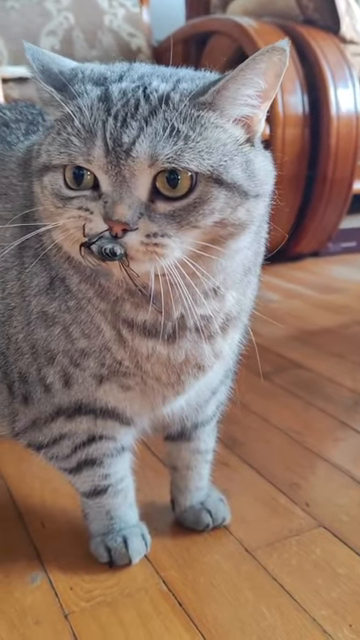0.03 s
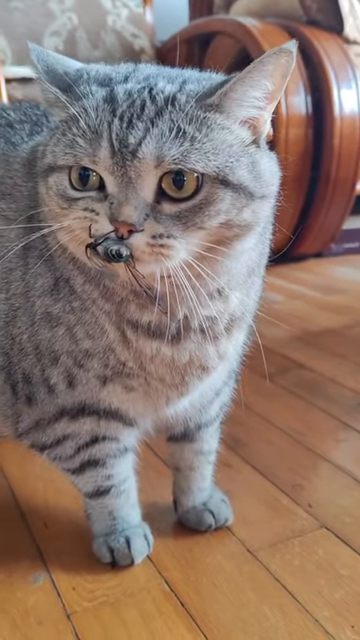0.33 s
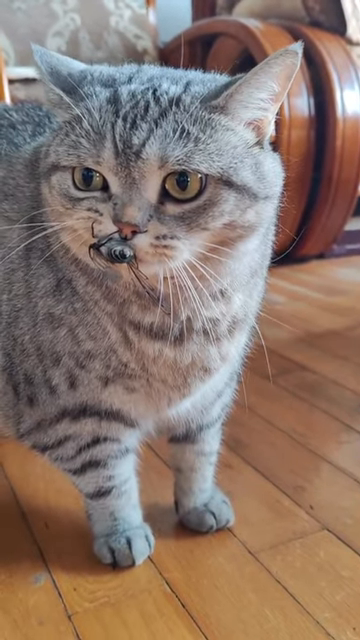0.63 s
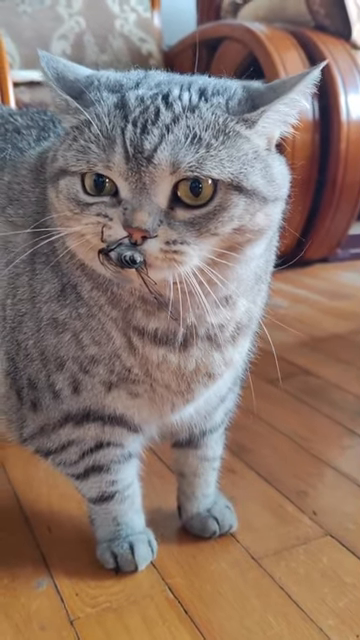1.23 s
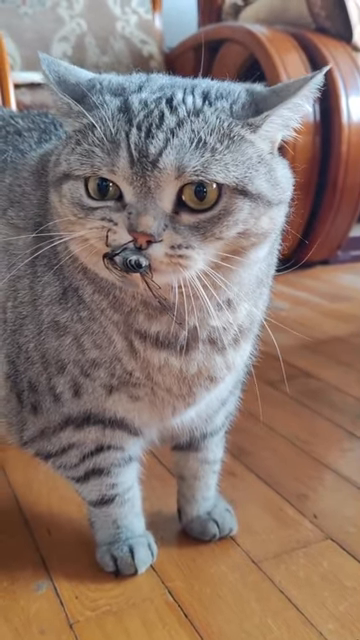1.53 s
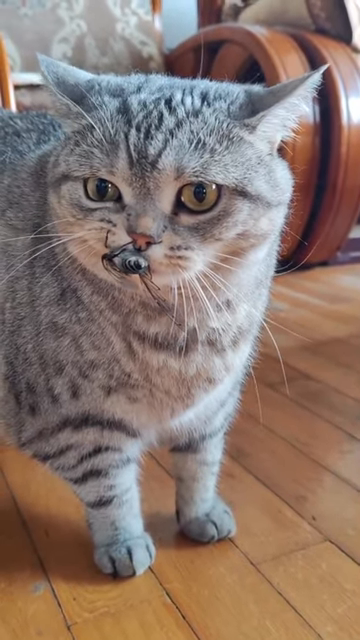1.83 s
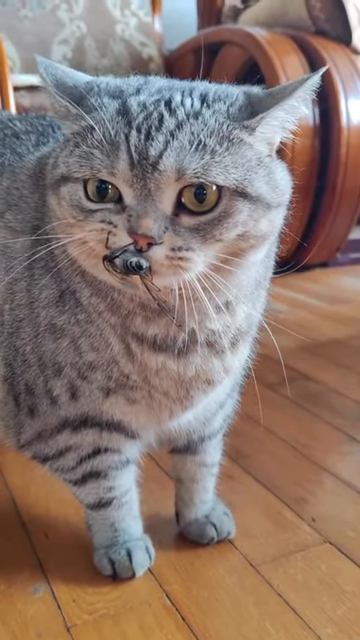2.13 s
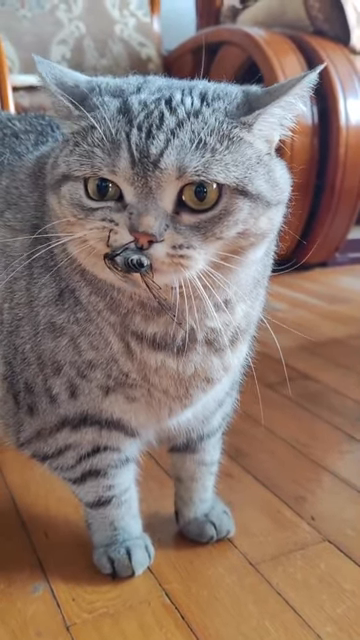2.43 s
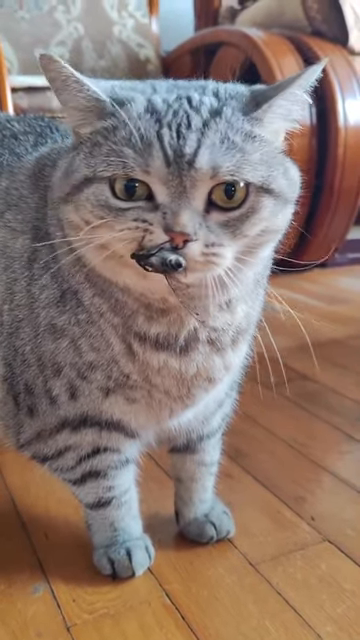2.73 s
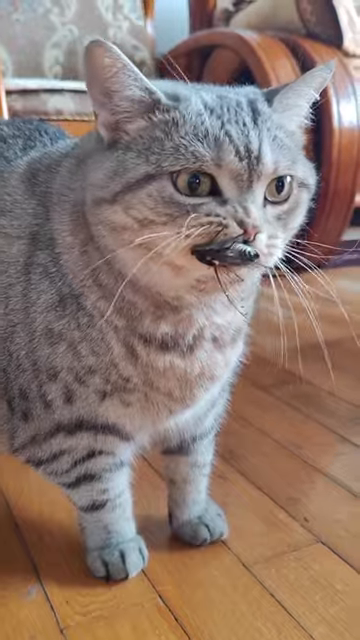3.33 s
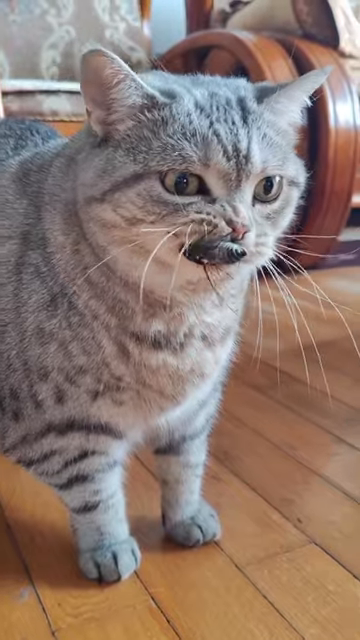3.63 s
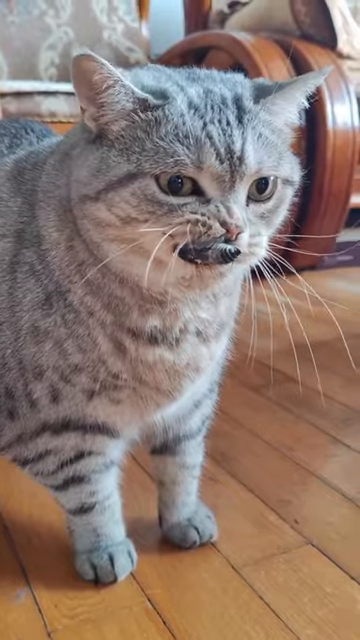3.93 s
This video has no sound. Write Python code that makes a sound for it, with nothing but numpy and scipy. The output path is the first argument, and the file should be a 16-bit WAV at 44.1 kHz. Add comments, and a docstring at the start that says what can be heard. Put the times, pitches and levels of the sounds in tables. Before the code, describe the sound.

Sudden harsh cicada buzz indoors, following a quiet stretch with faint, distant bird calls.

```python
"""Cat with a live cicada

A cat stands in a wood-floored room, a cicada in its mouth. Over low rumble, hiss and sizzle, a bird
whistles far outside; thin high tones and a faint buzz come and go. Late on, the insect squeaks, then
bursts into a harsh buzz: its two tymbals buckle in turn, each buckle a low ping, each spring-back a
higher ping with its overtone, with a crackle of ribs and a few sharp ticks on top."""
import sys
import numpy as np
from scipy import signal
from scipy.io import wavfile
from scipy.ndimage import uniform_filter1d

SR = 44100
rng = np.random.default_rng(int(sys.argv[2]) if len(sys.argv) > 2 else 0)


def generate_wav(signal):
    """Clip the signal to [-1, 1] and save it as 16-bit WAV at the path in sys.argv[1]."""
    frames = np.transpose(np.atleast_2d(signal))
    scaled = np.clip(frames, -1, 1) * 32767
    pcm = np.round(scaled).astype(np.int16)
    wavfile.write(sys.argv[1], SR, pcm)


N = 176400

# tone of each noise bed (frequency [Hz], left [dB], right [dB])
RUMBLE_EQ = [(33, -26, -28), (44.95, 2.5, 5), (101, -6.5, -6), (146, -1.5, 1.5), (191, 1, 2),
             (257, -7.5, -4), (700, -16, -15.5), (1006, -15, -14), (2400, -25.5, -26), (6050, -69, -47)]
HISS_EQ = [(1180, -32, -5), (2280, -18, -11.5), (2710, 1, 1), (3730, 1, 4), (4480, -3, 0),
           (5330, -10.5, -7.5), (6720, -12.5, -11.5), (7330, -33.5, -38)]
SIZZLE_EQ = [(6000, -37, -28), (9850, -28.5, -32.5), (10790, -9, -12), (12150, -4.5, -25), (12620, 3.5, -1),
             (13800, -4, -12), (16100, -13, -9.5)]
# fader ride of each bed (time [s], relative level [dB])
RUMBLE_RIDE = [(0.0, -57), (1.54, -58.5), (1.65, -52), (1.77, -58), (2.53, -57.5), (2.6, -54),
               (2.72, -57.5), (3.11, -56.5), (3.5, -64.5)]
HISS_RIDE = [(0.17, -60), (0.39, -63.5), (0.63, -58.5), (0.77, -62.5), (1.66, -65), (2.89, -62.5),
             (2.96, -61)]
SIZZLE_RIDE = [(0.56, -73.5), (1.01, -63), (1.18, -65.5)]
# stereo image of the beds (frequency [Hz], left-right correlation [-1 to 1])
BED_CORRELATION = [(100, 0.92), (290, 0.87), (640, 0.21), (1400, -0.41), (6000, 0.027)]
# distant bird notes (time [s], length [s], start pitch [Hz], end pitch [Hz], level [dB])
BIRD_NOTES = [(.22, .13, 1680, 1880, -71), (.47, 0.21, 1930, 1660, -65.5), (1.56, 0.1, 1850, 1780, -67.5),
              (1.61, 0.1, 1480, 1350, -67), (1.67, 0.18, 1260, 1160, -62.5), (2.33, 0.2, 1890, 1790, -60),
              (2.6, .13, 1220, 1120, -68.5)]
# the room's reverb (frequency [Hz], time to fall 60 dB [s])
ROOM_DECAY = [(500, 0.99), (4000, 0.51), (14000, 0.19)]
# a faint buzz, perhaps a wing (time [s], length [s], fundamental [Hz])
FAINT_BUZZ_CUE = (.49, .25, 169.6)
# its tone (frequency [Hz], gain [dB])
FAINT_BUZZ_EQ = [(3000, -25), (3450, 4.5), (4700, -1), (5200, -10)]
# cicada squeaks (time [s], length [s], start pitch [Hz], end pitch [Hz], relative level [dB])
SQUEAK_NOTES = [(3.269, 0.036, 4300, 3640, -50.5), (3.273, 0.025, 6250, 5300, -66),
                (3.299, 0.005, 4400, 4200, -50), (3.312, 0.0088, 2190, 1950, -38.5),
                (3.319, 0.0071, 5750, 5340, -35), (3.322, 0.0152, 4500, 3300, -44)]
# pace of each tymbal (time [s], cycle rate [Hz])
TYMBAL_RATE = [(3.339, 135), (3.4, 122), (3.46, 129), (3.52, 127), (3.57, 146), (3.64, 131.6), (3.8, 125),
               (4.0, 117.7)]
# inward snap (time [s], ring [Hz], relative level [dB], relative level of the abdomen's ring [dB])
BUCKLE_RING = [(3.35, 3700, -24, -39), (3.45, 3410, -24.5, -39), (3.485, 3870, -27, -52),
               (3.535, 4040, -29, -57), (3.614, 3580, -25, -49), (3.68, 3480, -27, -37.5),
               (3.74, 3460, -26.5, -41.5), (3.82, 3600, -27.5, -51), (3.89, 3600, -27, -46),
               (4.0, 3560, -25.5, -39.5)]
# outward snap (time [s], ring [Hz], relative level [dB])
SPRING_RING = [(3.35, 5290, -24.5), (3.405, 5200, -27), (3.45, 5780, -23), (3.53, 5910, -22.5),
               (3.6, 5900, -24), (3.72, 4980, -27), (3.79, 4940, -32.5), (3.89, 5240, -27),
               (4.0, 5340, -26)]
# balance of the rib crackle (time [s], lower treble [dB], middle treble [dB], top [dB])
RIB_CRACKLE = [(3.35, -35, -40, -44), (3.414, -36.5, -41, -38), (3.494, -32.5, -44, -40),
               (3.58, -34, -31.5, -38.5), (3.68, -37.5, -35.5, -33), (3.78, -37, -37, -32.5),
               (4.0, -37, -39, -37)]
# sharp ticks in the buzz (time [s], relative level [dB])
TICK_HITS = [(3.667, -20), (3.806, -26.5), (3.9563, -23.5)]
# moving notch in the buzz (time [s], centre [Hz], depth [0-1])
HOLLOW_SWEEP = [(3.45, 1900, .1), (3.53, 2520, .95), (3.66, 2480, .95), (3.75, 2380, .35), (3.87, 2500, .9)]
# tone of the cicada (frequency [Hz], left [dB], right [dB])
CICADA_EQ = [(600, -16, -12.5), (1390, -17, -15.5), (2130, -7.5, -2.5), (2715, 2, 0.5), (3380, -7.5, 1),
             (4080, -0.5, 4.5), (4640, -2.5, -2.5), (5140, -6, 5.5), (6530, -5.5, -2.5), (7640, -7, -1.5),
             (10500, -7, -4), (11180, 8, 5.5), (13100, 4, -6.5), (14200, 2.5, -2), (16100, -5, -1.5)]

BUZZ_START_S, POSE_S = 3.339, 0.141  # the head takes a new pose every POSE_S
EVEN_RATE_HZ, LIMP_S = 116, .0062  # above the even rate, the second tymbal falls later in the cycle
BUCKLE_S, SPRING_S, BELLY_S, RIB_S = 0.00016, 0.00015, 0.00046, 0.00072  # envelope time constants
BUCKLE_DB, SPRING_DB, OVERTONE_DB, BELLY_DB, RIB_DB = 3.5, 0.5, -17, 3.5, 10  # trims on the tables
BELLY_HZ, SPRING_LAG_S = 2120, .0026
JITTER_S, UNEVEN_DB, PITCH_SCATTER = .0001, 0.6, 0.033  # spread from snap to snap
EARLY_DB, ROOM_DB, RIGHT_LAG_S = -5.5, -9.5, 0.00014  # the cicada's reverb sends and stereo offset


def amp(db):
    """Decibels to gain."""
    return 10 ** (np.asarray(db) / 20)


def unit(x):
    """Scales to rms 1."""
    return x / np.sqrt(np.mean(x ** 2) + 1e-20)


def curve(table, s):
    """All columns of a time table at s."""
    times, *columns = np.transpose(table)
    return np.array([np.interp(s, times, c) for c in columns])


def spectrum(table, hz):
    """All columns of a frequency table at hz."""
    f, *columns = np.transpose(table)
    return np.array([np.interp(np.log(hz + 1), np.log(f), c) for c in columns])


def add(mix, s, sound):
    """Mixes a sound in at time s."""
    part = mix[..., round(s * SR):][..., :sound.shape[-1]]
    part += sound[..., :part.shape[-1]]


def band(x, lo_hz, hi_hz):
    """Band-pass."""
    return signal.sosfilt(signal.butter(3, [lo_hz, hi_hz], "band", fs=SR, output="sos"), x)


def noise_bed(eq, ride, gain_db, patchy_db, lines_db, size=2048):
    """Stereo noise with drifting patches and soft, narrow resonances that come and go."""
    hz, hop = np.fft.rfftfreq(size, 1 / SR), size // 4
    a, b, c, d, patches = rng.standard_normal((N // hop + 5, len(hz), 5)).T
    patches = unit(uniform_filter1d(uniform_filter1d(patches, size=8, axis=0), size=8, axis=1))
    lines = uniform_filter1d(rng.standard_normal(a.shape), size=26, axis=1)
    lines = unit(np.tanh(unit(lines)))
    likeness = spectrum(BED_CORRELATION, hz).T
    left = a + 1j * b
    right = likeness * left + np.sqrt(1 - likeness ** 2) * (c + 1j * d)
    gain = amp(spectrum(eq, hz)[:, :, None] + patchy_db * patches + lines_db * lines)
    noise = signal.istft(np.array([left, right]) * gain, nperseg=size, noverlap=size - hop)[1][:, :N]
    return unit(noise) * amp(gain_db + curve(ride, np.arange(N) / SR))


def whistles(notes, waver, blur, blur_hz):
    """Gliding tones that swell and fade; a share of each is blurred into a narrow band of noise."""
    out = np.zeros(N)
    smooth = signal.butter(2, blur_hz, fs=SR, output="sos")
    a, b = unit(signal.sosfilt(smooth, rng.standard_normal((2, N))))
    fuzz = np.sqrt(1 - blur) + np.sqrt(blur / 2) * (a + 1j * b)
    for s, length, from_hz, to_hz, db in notes:
        u = np.linspace(0, 1, round(length * SR))
        drift = np.interp(u, np.linspace(0, 1, 10), rng.standard_normal(10))
        hz = (from_hz + (to_hz - from_hz) * u ** 1.41) * (1 + waver * drift)
        tone = fuzz[round(s * SR):][:len(u)] * np.exp(2j * np.pi * np.cumsum(hz) / SR)
        add(out, s, amp(db) * 2 * np.sin(np.pi * u ** 0.91) * tone.real)
    return out


def thin_tones(count=26, low_hz=3750, high_hz=5050, length_s=.28, within_s=1.85, db=-78.5):
    """A soft cluster of thin high tones that come and go at random in the first half."""
    when, place = rng.random((count, 2)).T
    pitches = low_hz + (high_hz - low_hz) * place
    notes = [(s, length_s, hz, hz, db) for s, hz in zip(when * within_s, pitches)]
    return whistles(notes, waver=0, blur=0.68, blur_hz=8.5)


def bird():
    """Mostly falling whistles from far outside, blurred by distance."""
    song = whistles(BIRD_NOTES, waver=0.013, blur=0.45, blur_hz=40)
    return song + amp(-14) * room(song)


def room(x, size=256):
    """Diffuse tail, different left and right, the treble dying first."""
    hz, t, noise = signal.stft(rng.standard_normal((2, SR // 2)), SR, nperseg=size)
    decay = amp(-60 * t / spectrum(ROOM_DECAY, hz).T) * (t > 0)
    tail = signal.istft(noise * decay, SR, nperseg=size)[1]
    return signal.fftconvolve(x[None], tail / np.linalg.norm(tail[0]), axes=1)[:, :N]


def faint_buzz():
    """A brief, thin buzz of high harmonics drifting in phase, heard through the room."""
    s, length, pitch = FAINT_BUZZ_CUE
    t = np.arange(round(length * SR)) / SR
    partials = pitch * np.arange(18, 39)
    gains = amp(spectrum(FAINT_BUZZ_EQ, partials)[0]) * rng.rayleigh(size=len(partials))
    drift = np.cumsum(rng.standard_normal((len(partials), len(t))), axis=1) / np.sqrt(SR)
    buzz = gains @ np.sin(2 * np.pi * (partials[:, None] * t + drift + rng.random((len(partials), 1))))
    out = np.zeros(N)
    add(out, s, amp(-60) * unit(buzz * np.sin(np.pi * t / length) ** .5))
    return out + room(out)


def squeaks(grains_per_s=1500):
    """Falling squeaks over a gritty scratching that grows until the buzz starts."""
    t, first = np.arange(N) / SR, SQUEAK_NOTES[0][0]
    grit = band(rng.standard_normal(N) * (rng.random(N) < grains_per_s / SR), 2000, 6500)
    swell = np.clip((t - first) / (BUZZ_START_S - first), 0, 1) * (t < BUZZ_START_S)
    chirps = whistles(SQUEAK_NOTES, waver=0.014, blur=0.2, blur_hz=300)
    return chirps + amp(-54) * swell * unit(grit)


def ping(hz, tau_s):
    """One short ring of tymbal or abdomen, of unit energy, peaking near three time constants."""
    t = np.arange(SR // 200) / SR
    ring = (t / tau_s) ** 2.97 * np.exp(-t / tau_s) * np.sin(2 * np.pi * hz * t)
    return ring / np.linalg.norm(ring)


def puff(decay_s):
    """A tiny burst of crackle, of unit energy, different left and right."""
    t = np.arange(SR // 200) / SR
    burst = rng.standard_normal((2, len(t))) * np.exp(-t / decay_s) * (1 - np.exp(-2 * t / decay_s))
    return burst / np.linalg.norm(burst, axis=1, keepdims=True)


def tymbals():
    """Two tymbals buckle in turn and spring back; every snap rings and crackles."""
    t = np.arange(N) / SR
    rate = curve(TYMBAL_RATE, t)[0]
    cycles = np.cumsum(rate * (t >= BUZZ_START_S)) / SR
    first = np.arange(cycles[-1])
    second = first + .5 + LIMP_S * (np.interp(first, cycles, rate) - EVEN_RATE_HZ)
    snaps = np.sort(np.r_[first, second])
    rings, ribs = np.zeros(N), np.zeros((2, N))
    for s in t[np.searchsorted(cycles, snaps, "right").clip(0, N - 1)]:
        dice = rng.standard_normal(8)
        jitter, uneven, detune = JITTER_S * dice, amp(UNEVEN_DB * dice), 1 + PITCH_SCATTER * dice
        inward, outward = s + jitter[0], s + SPRING_LAG_S + jitter[1]
        hz, db, belly_db = curve(BUCKLE_RING, s)
        add(rings, inward, amp(BUCKLE_DB + db) * uneven[2] * ping(hz * detune[3], BUCKLE_S))
        add(rings, inward, amp(BELLY_DB + belly_db) * ping(BELLY_HZ * detune[3], BELLY_S))
        add(ribs, inward, uneven[6] * puff(RIB_S * 2))
        hz, db = curve(SPRING_RING, s)
        add(rings, outward, amp(SPRING_DB + db) * uneven[4] * ping(hz * detune[5], SPRING_S))
        add(rings, outward, amp(OVERTONE_DB + db) * ping(2 * hz * detune[6], SPRING_S / 2))
        add(ribs, outward, uneven[7] * puff(RIB_S))
    strength = np.sqrt(SR / (2 * rate.mean()))  # brings a train of unit-energy snaps near rms 1
    return strength * (rings + rib_crackle(ribs))


def rib_crackle(ribs):
    """The crackle of the tymbals' ribs, in three treble bands whose balance shifts."""
    low, middle, top = amp(RIB_DB + curve(RIB_CRACKLE, np.arange(N) / SR))
    return (low * band(ribs, 6780, 11000) + middle * band(ribs, 10280, 12990)
            + top * band(ribs, 12580, 14950))


def ticks():
    """Sharp bright ticks of the struggling insect."""
    out = np.zeros((2, N))
    for s, db in TICK_HITS:
        add(out, s, amp(db) * unit(puff(decay_s=0.00074)))
    return band(out, 8100, 17000)


def poses(x):
    """Splits a sound into crossfading stretches, one for each pose of the head."""
    t = np.arange(N) / SR
    centres = np.arange(BUZZ_START_S, N / SR + POSE_S, POSE_S)
    return [x * np.cos(np.pi / 2 * np.clip((t - s) / POSE_S, -1, 1)) for s in centres]


def near_echoes(x, count=14, spread_s=.0035):
    """First reflections off the cat's face, the floor and the furniture."""
    out = np.zeros((2, N))
    for channel in out:
        delays = spread_s * (.1 + rng.exponential(1, count))
        for s, sign in zip(delays, rng.choice([-1, 1], count)):
            add(channel, s, sign * x / np.sqrt(count))
    return out


def equalise(pair, eq, size=2048):
    """Minimum-phase EQ for each channel."""
    log_gain = np.log(amp(spectrum(eq, abs(np.fft.fftfreq(size, 1 / SR)))))
    taps = np.fft.ifft(np.exp(np.conj(signal.hilbert(log_gain)))).real
    return signal.oaconvolve(pair, taps, axes=1)[:, :N]


def hollow(x, width_hz=420):
    """A notch that slides and deepens as the head turns: the buzz's "wah"."""
    hz, depth = curve(HOLLOW_SWEEP, np.arange(N) / SR)
    carrier = np.exp(2j * np.pi * np.cumsum(hz) / SR)
    pole = np.exp(-np.pi * width_hz / SR)
    # shift the notch's centre to 0 Hz, low-pass, shift back and subtract
    inside = signal.lfilter([(1 - pole) / 2] * 2, [1, -pole], x / carrier + 1e-18)
    return x - depth * 2 * (carrier * inside).real


def cicada():
    """The insect in stereo; its near echoes and room tail change with each pose of the head."""
    buzz = tymbals() + ticks()
    left, right = buzz + squeaks()
    late_right = np.r_[np.zeros(round(RIGHT_LAG_S * SR)), right][:N]
    direct = np.array([left, late_right])
    early = sum(near_echoes(part) for part in poses(buzz[0]))
    tail = sum(room(part) for part in poses(right))
    return hollow(equalise(direct + amp(EARLY_DB) * early + amp(ROOM_DB) * tail, CICADA_EQ))


def scene():
    """Cicada, bird, faint buzz and thin tones over the room's rumble, a soft hiss and a high sizzle."""
    rumble = noise_bed(RUMBLE_EQ, RUMBLE_RIDE, gain_db=1.0, patchy_db=2, lines_db=2.14)
    hiss = noise_bed(HISS_EQ, HISS_RIDE, gain_db=2.0, patchy_db=1.8, lines_db=7.0)
    sizzle = noise_bed(SIZZLE_EQ, SIZZLE_RIDE, gain_db=3.5, patchy_db=2, lines_db=3)
    return cicada() + bird() + faint_buzz() + thin_tones() + rumble + hiss + sizzle


def record(dry):
    """A steep high cut at 15.8 kHz on the whole mix."""
    high_cut = signal.firwin(511, 15800, window=("kaiser", 9), fs=SR)
    return signal.oaconvolve(dry, high_cut[None], "same")


dry = scene()
out = record(dry)
generate_wav(out)
```